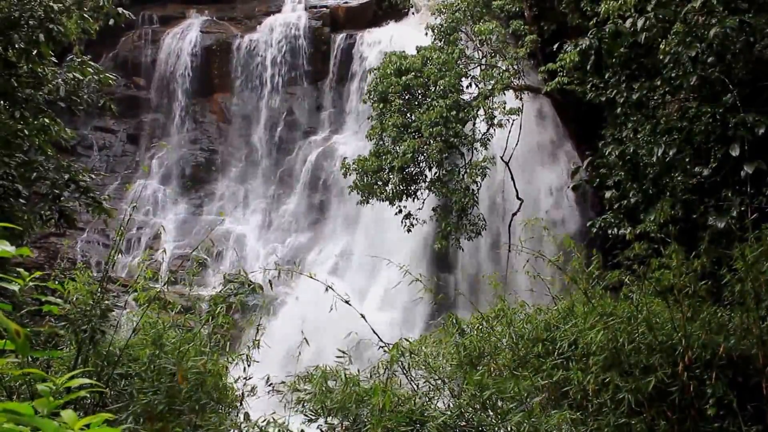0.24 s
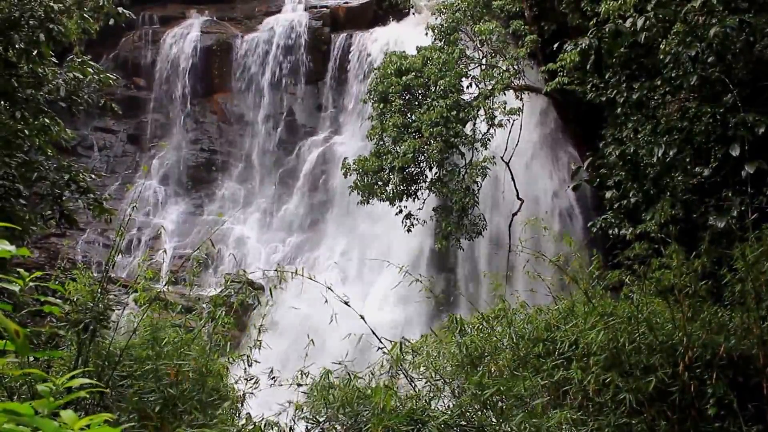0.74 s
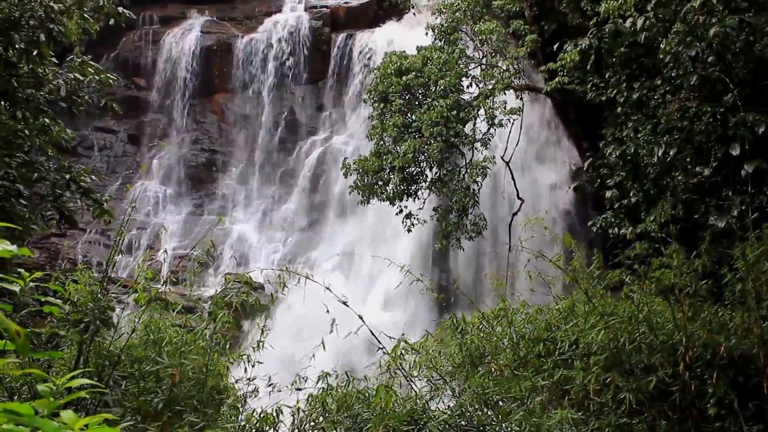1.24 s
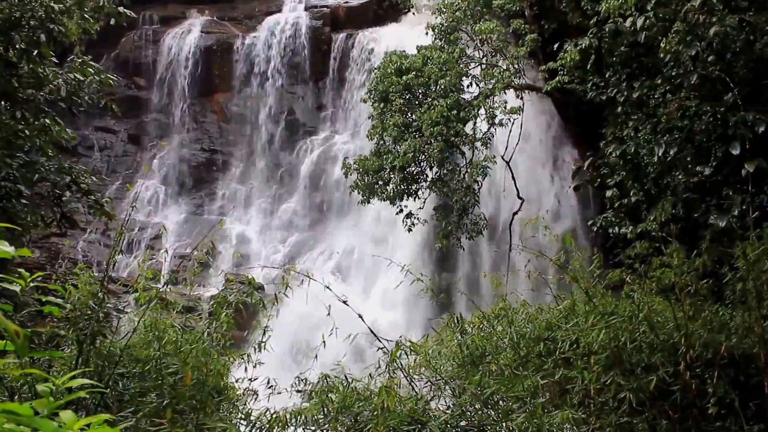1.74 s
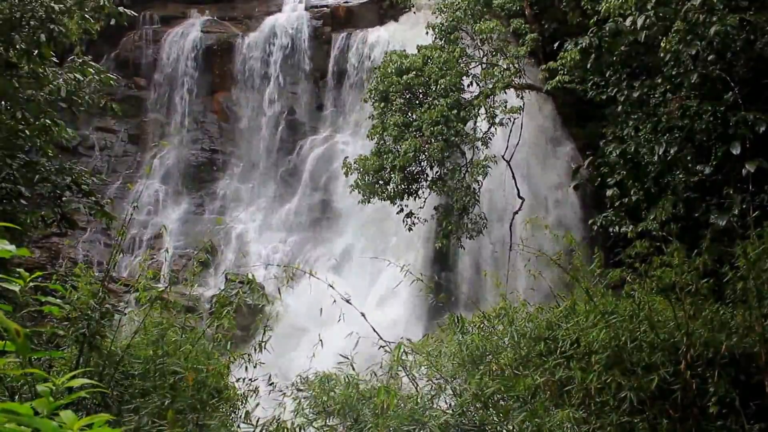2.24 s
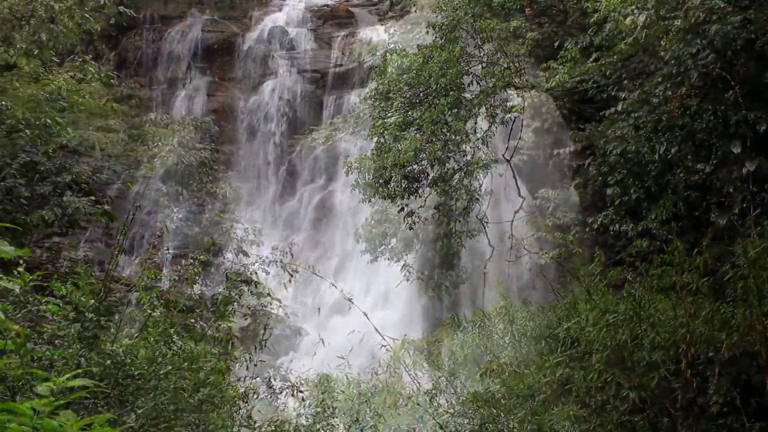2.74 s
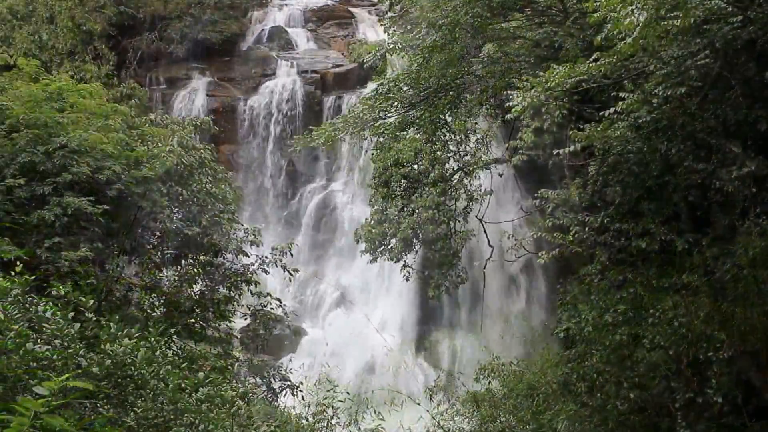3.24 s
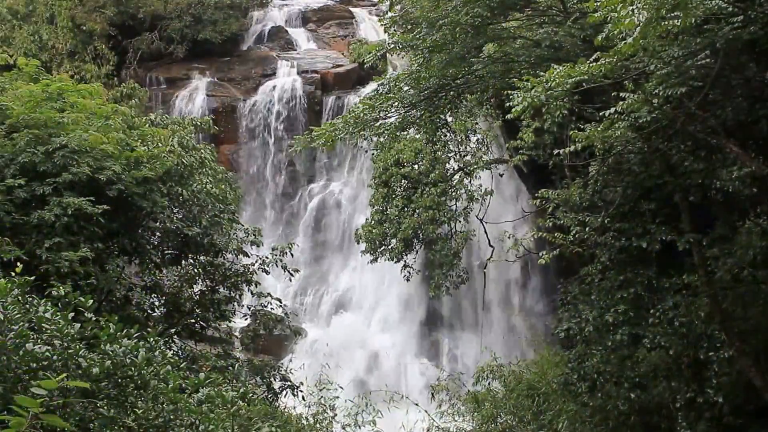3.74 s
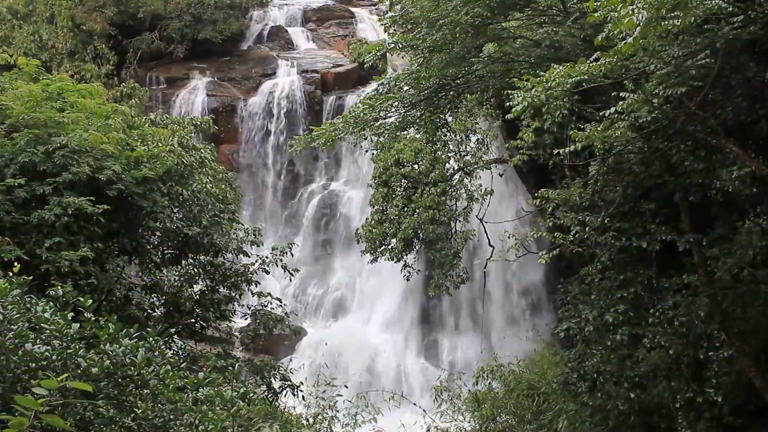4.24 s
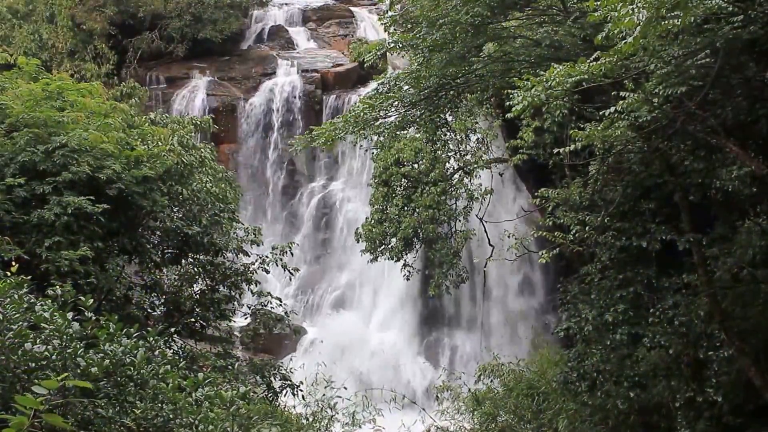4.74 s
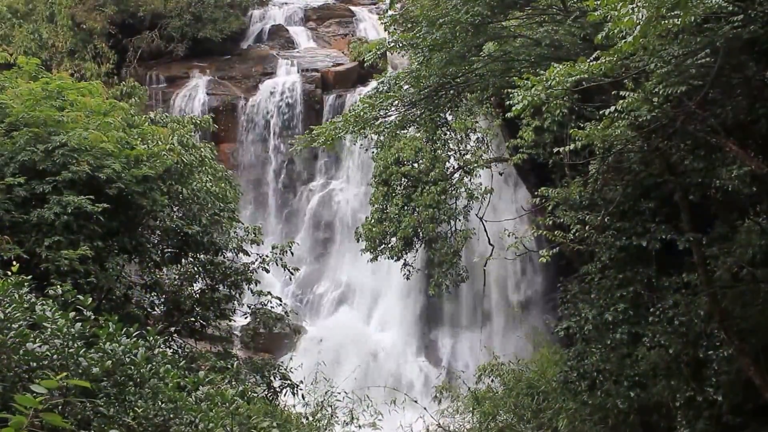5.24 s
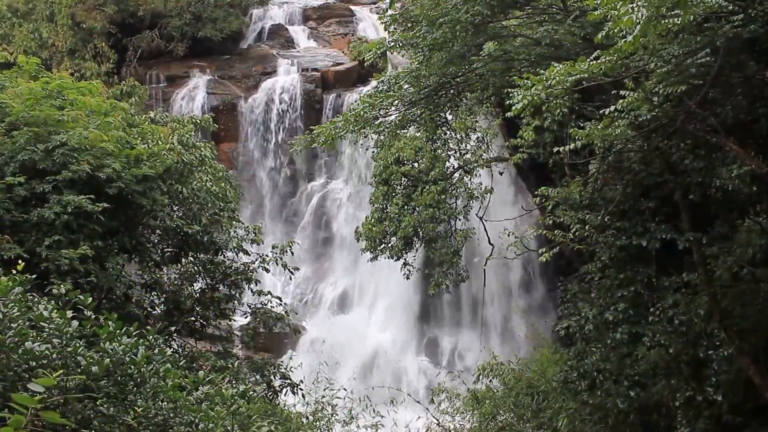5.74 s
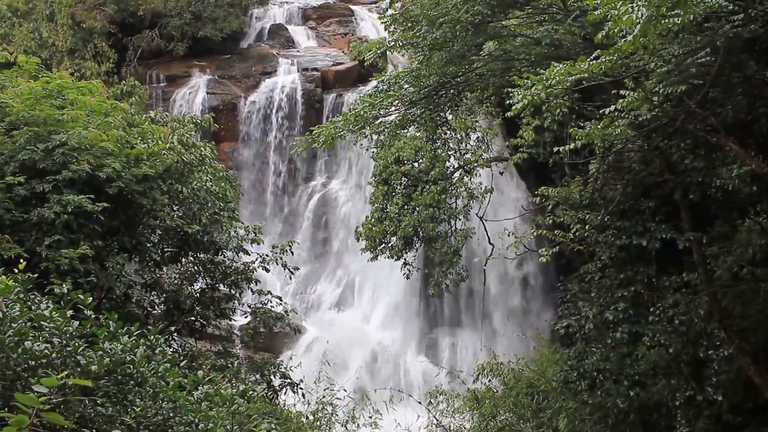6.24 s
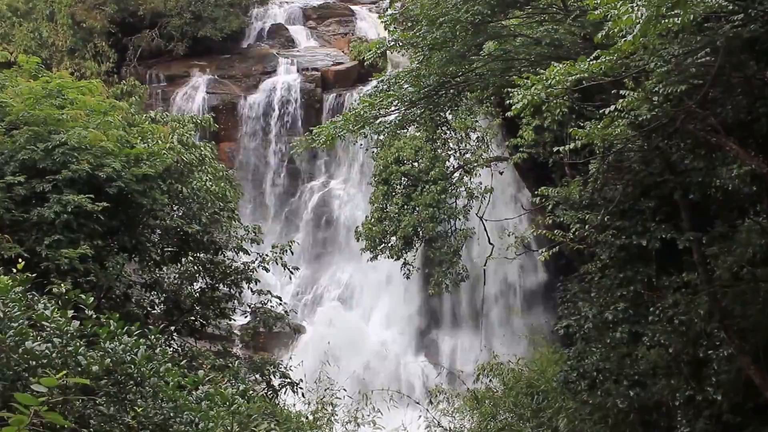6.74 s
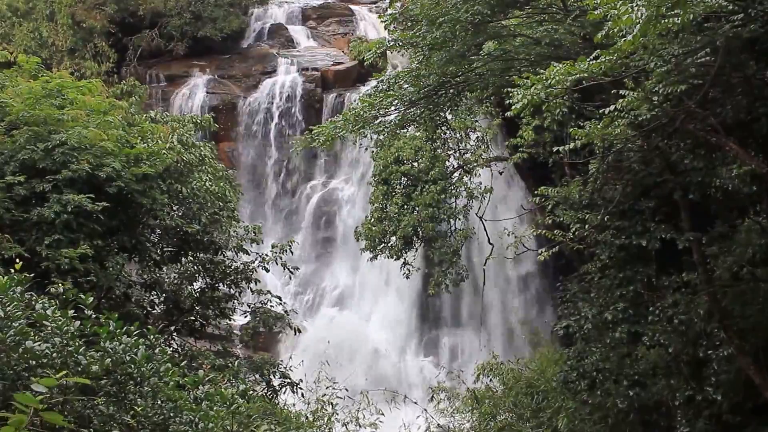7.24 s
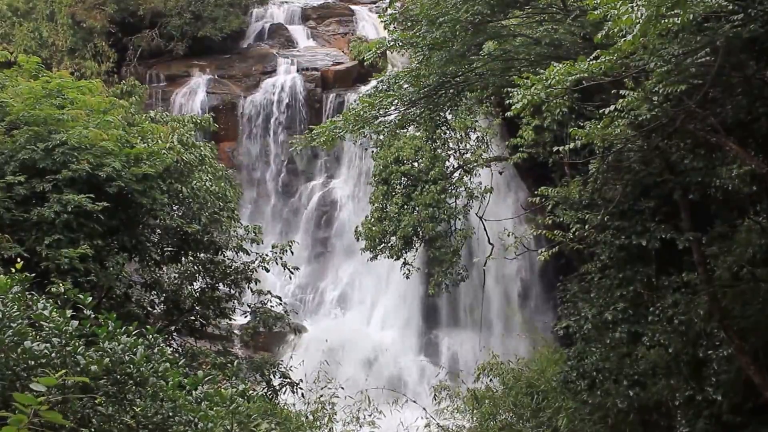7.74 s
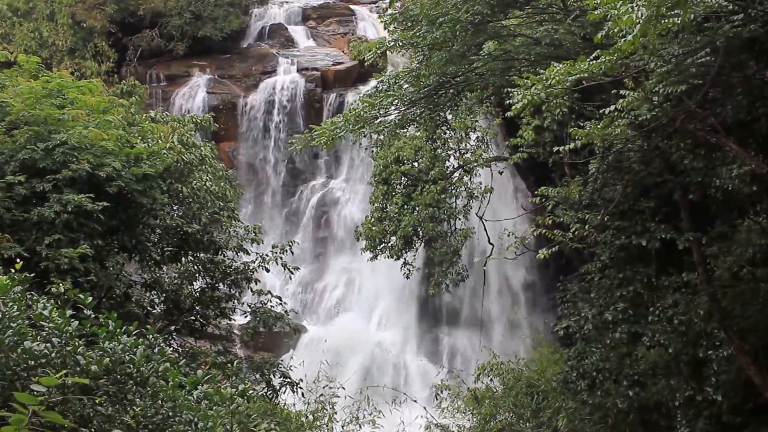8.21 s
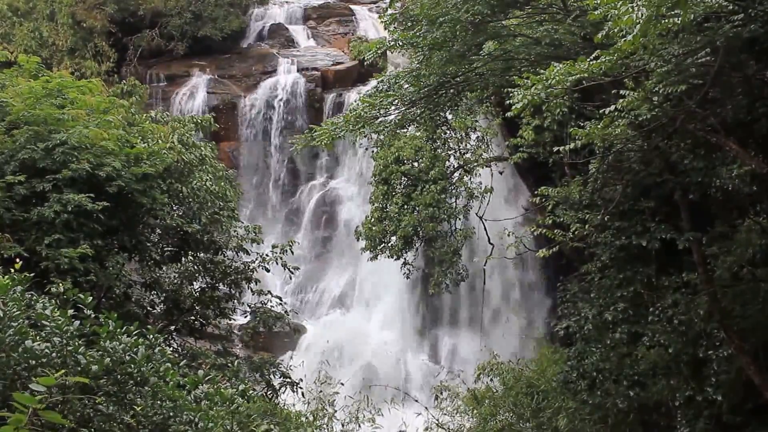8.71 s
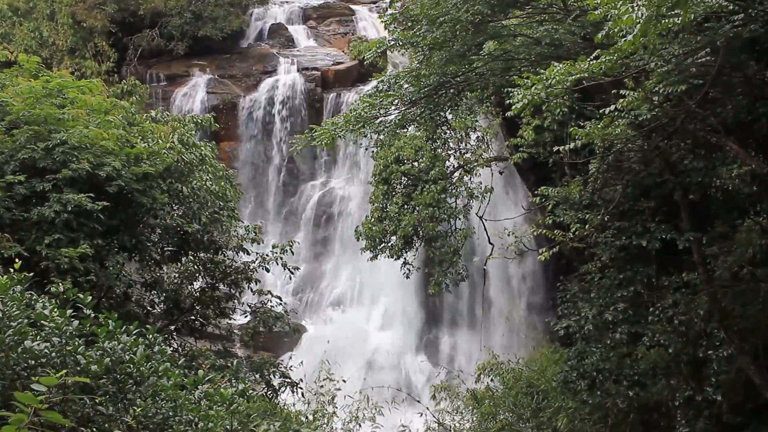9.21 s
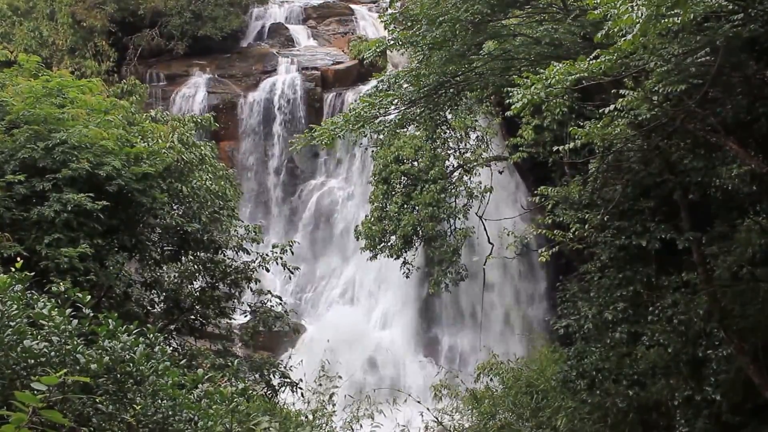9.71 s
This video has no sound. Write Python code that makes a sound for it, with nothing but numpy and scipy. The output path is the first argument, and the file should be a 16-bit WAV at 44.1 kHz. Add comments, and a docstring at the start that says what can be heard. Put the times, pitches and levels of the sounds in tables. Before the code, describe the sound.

The dense rush of a forest waterfall swells for a moment, then eases as light gusts bump against the microphone.

```python
"""A tall waterfall in a forest, heard on one microphone from a near and a far standpoint.
Countless splashes and bubbles merge into a roar, coloured by its path through the trees and off the ground.
The near standpoint sounds first; the far one joins it, both roar together, and the near one stops short.
At the far spot, light wind on the microphone makes a low, gusty rumble and soft thumps."""
import sys
import numpy as np
from scipy import signal
from scipy.fft import rfft, irfft, next_fast_len
from scipy.io import wavfile
from scipy.ndimage import uniform_filter1d, map_coordinates

SR = 44100
rng = np.random.default_rng(int(sys.argv[2]) if len(sys.argv) > 2 else 0)


def inscribe(sig):
    """Save sig as 16-bit PCM at rate SR to the path in sys.argv[1].

    A 1-D sig is mono; a 2-D sig holds one channel per row.
    Samples are clipped to [-1, 1] before scaling.
    """
    pcm = np.round(np.clip(np.atleast_2d(sig).T, -1, 1) * 32767)
    wavfile.write(sys.argv[1], SR, pcm.astype(np.int16))


N = 439677

# colour of the fall at the near spot, through trees and off the ground: (frequency [Hz], gain [dB])
NEAR_PATH = [(80, -3), (240, 0.3), (335, 0.5), (400, 0.3), (470, -1.6), (600, -5.5), (800, -2), (1250, -.7),
             (1780, -3), (2000, 0), (2400, -1.7), (3600, -1.3), (5000, -3), (10000, -5), (16000, -8)]
# colour of the fall at the far spot: (frequency [Hz], gain [dB])
FAR_PATH = [(90, -4.5), (225, 0), (390, -1), (530, -7), (710, -5), (820, -1.5), (1050, -2.5), (1680, -4),
            (2030, -1.7), (2600, -4), (3050, -2.5), (3400, -3.5), (5600, -4.5), (16000, -10.5)]
# microphone response, dropping bass and top: (frequency [Hz], gain [dB])
MIC_RESPONSE = [(10, -50), (30, -24.5), (70, -14), (110, -7), (160, -5.5), (210, -0.5), (10000, -0.5),
                (12000, -2), (13200, -5.5), (14400, -8.5), (15700, -15), (16000, -16)]
# colour of wind buffeting the microphone: (frequency [Hz], gain [dB])
BUFFET_SPECTRUM = [(10, -12), (40, 3), (80, 1.5), (130, -3), (200, -11), (400, -32), (1000, -100)]
# gusts on the microphone: (peak time [s], peak level [dB], spread [s])
GUSTS = [(2.9, -51, .4), (5.78, -40, .07), (6.1, -38, .14), (6.65, -43, .13), (7.66, -38, 0.15),
         (8.33, -42, .05), (8.66, -35, .1), (9.0, -33.5, 0.28), (9.64, -41, .09), (9.96, -44, .04)]
# the strongest eddies on the microphone: (centre time [s], envelope peak [dB], pitch [Hz])
THUMPS = [(5.76, -28, 125), (5.8, -35, 55), (6.04, -27, 100), (6.6, -34, 60), (6.76, -37, 60),
          (7.54, -26, 130), (7.71, -35, 60), (7.8, -34, 80), (8.34, -29, 85), (8.62, -27, 130),
          (8.705, -26, 85), (8.897, -20, 130), (9.055, -23, 130), (9.285, -19, 150), (9.6, -33, 75)]

NEAR_DB, NEAR_DRIFT_DB_PER_S, NEAR_STOPS_S = -16, -0.01, 3.47
FAR_DB, FAR_STARTS_S = -18, 2.0
FAR_SWELL_DB, FAR_SWELL_PEAK_S, FAR_SWELL_SPREAD_S = 0.5, 7.2, 1.2
CALM_WIND_DB = -58
TOP_HZ = 15750


def amp(db):
    """Gain of a level in dB."""
    return 10 ** (np.asarray(db) / 20)


def unit(x):
    """x at rms 1."""
    return x / np.sqrt(np.mean(x ** 2))


def wobble(knots_per_s):
    """A smooth random curve."""
    knots = rng.standard_normal(int(N * knots_per_s / SR) + 4)
    return map_coordinates(knots, [np.arange(N) * knots_per_s / SR])


def coloured(x, *spectra):
    """x through (frequency [Hz], gain [dB]) spectra read on a log frequency axis."""
    size = next_fast_len(N + 8192)
    log_hz = np.log(np.fft.rfftfreq(size, 1 / SR) + 1)
    curves = map(np.transpose, spectra)
    gain_db = sum(np.interp(log_hz, np.log(hz + 1), db) for hz, db in curves)
    return irfft(rfft(x, size) * amp(gain_db), size)[:N]


def waterfall_roar(path, patchy_db, surge_db):
    """Splashes and bubbles merge to noise; sheets of water make soft patches and surges in it."""
    splashes = signal.stft(rng.standard_normal(N), nperseg=512)[2]
    patches = uniform_filter1d(rng.standard_normal(splashes.shape), size=20, axis=0)  # across frequency
    patches = uniform_filter1d(patches, size=12, axis=1)  # across time
    sheets = signal.istft(splashes * amp(patchy_db * unit(patches)), nperseg=512)[1][:N]
    surges = amp(surge_db * wobble(knots_per_s=12))
    return unit(coloured(sheets * surges, path, MIC_RESPONSE))


def wind_rumble():
    """Eddies press on the microphone in an uneven rumble; each gust swells and fades over the calm."""
    t = np.arange(N) / SR
    gust_power = sum(amp(db) ** 2 * np.exp(-((t - peak_s) / spread) ** 2) for peak_s, db, spread in GUSTS)
    strength = np.sqrt(amp(CALM_WIND_DB) ** 2 + gust_power)
    eddies = rng.standard_normal(N) * amp(2.9 * wobble(knots_per_s=25))
    return strength * unit(coloured(eddies, BUFFET_SPECTRUM, MIC_RESPONSE))


def wind_thumps(spread_cycles):
    """Each strong eddy gives the microphone one soft push, a cycle or two long."""
    thumps = np.zeros(N + SR)
    t = np.arange(-SR // 10, SR // 10) / SR
    phases = rng.uniform(0, 2 * np.pi, len(THUMPS))
    for (centre_s, db, hz), phase in zip(THUMPS, phases):
        envelope = amp(db) * np.exp(-(t * hz / spread_cycles) ** 2)
        start = round((centre_s + t[0]) * SR)
        thumps[start:start + len(t)] += envelope * np.sin(2 * np.pi * hz * t + phase)
    return thumps[:N]


def scene():
    """The near and far standpoints overlap with abrupt edges; mono on both channels."""
    t = np.arange(N) / SR
    near_gain = amp(NEAR_DB + NEAR_DRIFT_DB_PER_S * t)
    near = near_gain * waterfall_roar(NEAR_PATH, patchy_db=0.36, surge_db=0.1)
    swell_db = FAR_SWELL_DB * np.exp(-((t - FAR_SWELL_PEAK_S) / FAR_SWELL_SPREAD_S) ** 2)
    far = amp(FAR_DB + swell_db) * waterfall_roar(FAR_PATH, patchy_db=0.37, surge_db=0.14)
    wind = wind_rumble() + wind_thumps(spread_cycles=0.89)
    mono = near * (t < NEAR_STOPS_S) + (far + wind) * (t > FAR_STARTS_S)
    return np.array([mono, mono])


def record(dry):
    """Nothing is kept above the band limit."""
    size = next_fast_len(N + 8192)
    passband = np.fft.rfftfreq(size, 1 / SR) < TOP_HZ
    return irfft(rfft(dry, size) * passband, size)[:, :N]


dry = scene()
out = record(dry)
inscribe(out)
```